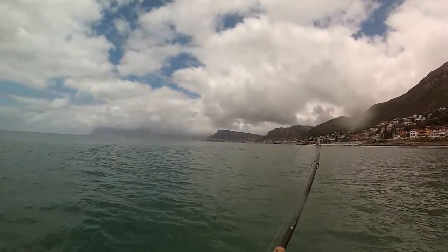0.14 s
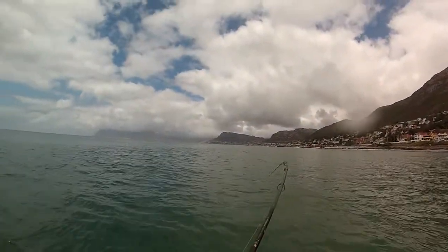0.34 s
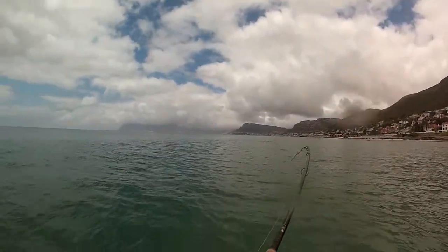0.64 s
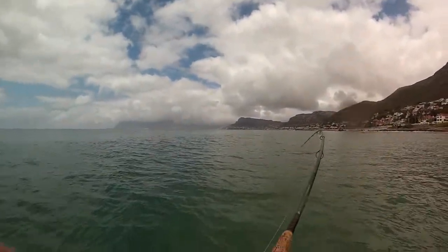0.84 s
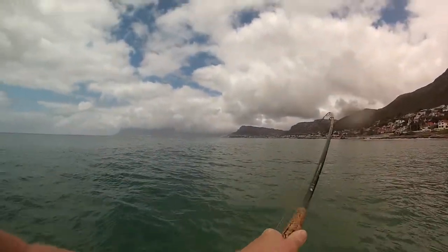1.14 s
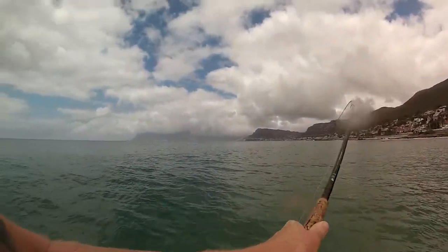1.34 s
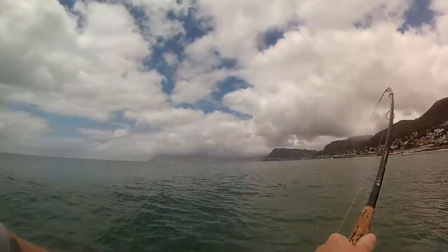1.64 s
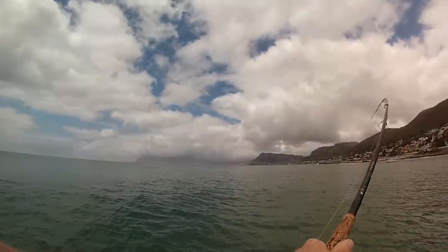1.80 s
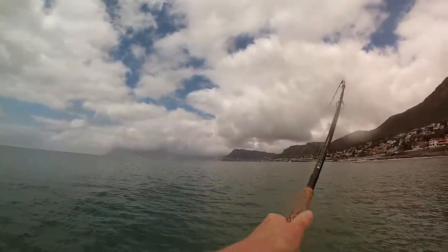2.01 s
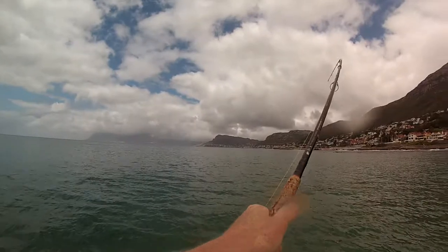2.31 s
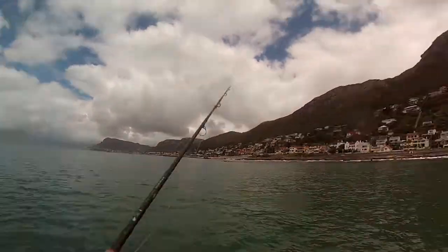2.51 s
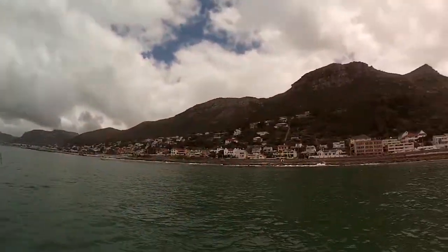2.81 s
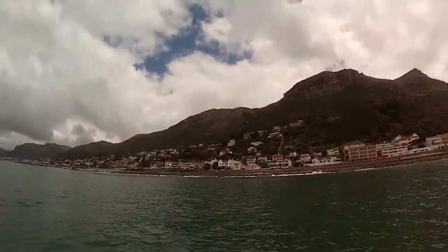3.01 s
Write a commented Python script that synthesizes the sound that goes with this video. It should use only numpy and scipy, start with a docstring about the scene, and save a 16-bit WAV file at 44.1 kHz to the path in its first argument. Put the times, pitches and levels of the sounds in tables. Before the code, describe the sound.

Water lapping on a hollow board, close and boxy: bubbly wash, soft slaps and short splashes early, a quiet lull, then renewed splashes, clicking drops and deep buffeting as the camera turns; faint sea hush throughout.

```python
"""Choppy open water, heard inside a camera's closed waterproof case as small waves lap at a paddleboard.
Slaps are soft pulses with a damped board tone; wash is dense bubble rings over coloured noise.
Splashes are short noise bursts, spray is noise in wavering resonances, plops are damped rising tones.
Drops tick as filtered clicks with tiny rings. Low noise bands buffet the case, strongest in a turn
near the end; a steady sea hush lies behind, with a treble fizz in the turn."""
import sys
import numpy as np
from scipy import signal
from scipy.fft import rfft, irfft, next_fast_len
from scipy.io import wavfile
from scipy.ndimage import uniform_filter1d, map_coordinates

SR = 44100
rng = np.random.default_rng(int(sys.argv[2]) if len(sys.argv) > 2 else 0)


def wav_out(sig):
    """Save sig, one row per channel (or a flat mono array), as 16-bit PCM at SR to the path in sys.argv[1]."""
    wavfile.write(sys.argv[1], SR, np.round(np.clip(np.atleast_2d(sig).T, -1, 1) * 32767).astype(np.int16))


N = 138915


def undb(db):
    """Decibels to amplitude gain."""
    return 10 ** (np.asarray(db) / 20)


def unit(x):
    """Scale to rms 1."""
    return x / np.sqrt(np.mean(x ** 2))


def even(x, seconds):
    """Hold the rms near 1 over stretches of this length."""
    power = uniform_filter1d(x ** 2, size=max(int(seconds * SR), 1))
    return x / np.sqrt(power + 1e-9)


def curve(rows, axis=1):
    """Gain over time, linear in dB between the points of one column."""
    rows = np.array(rows)
    return undb(np.interp(np.arange(N) / SR, rows[:, 0], rows[:, axis]))


def colour(x, points):
    """Minimum-phase filter through (f/Hz, gain/dB) points, by folding the cepstrum."""
    hz, db = np.array(points).T
    size = next_fast_len(2 * N)
    f = np.arange(size // 2 + 1) * SR / size
    gain = undb(np.interp(np.log(f + 1e-9), np.log(hz), db))
    cepstrum = irfft(np.log(gain), size)
    cepstrum[1:size // 2] *= 2
    cepstrum[size // 2 + 1:] = 0
    response = np.exp(rfft(cepstrum))
    return irfft(rfft(x, size) * response, size)[:N]


def noise(points):
    """Coloured noise of rms 1."""
    return unit(colour(rng.standard_normal(N), points))


def walk(steps_per_s):
    """Random steps smoothed twice over one step length, rms 1."""
    k = int(SR / steps_per_s)
    steps = np.repeat(rng.standard_normal(N // k + 1), k)
    smooth = uniform_filter1d(uniform_filter1d(steps, k), k)
    return unit(smooth[:N])


def add(out, start_s, sound):
    """Mix a sound in at its start time."""
    i = max(int(start_s * SR), 0)
    out[i:i + len(sound)] += sound[:max(N - i, 0)]


def bubble(hz, t60_s):
    """Damped ring of a bubble, rising a little in pitch."""
    rise, attack = 0.04, 0.022  # pitch rise per t60 as a share of hz; attack as a share of t60
    t = np.arange(int(t60_s * SR) + 2) / SR
    tone = np.sin(2 * np.pi * hz * t * (1 + rise * t / t60_s / 2))
    decay = np.exp(-np.log(1000) * t / t60_s)
    onset = 1 - np.exp(-t / (attack * t60_s))
    return tone * decay * onset


def slaps():
    """Each wavelet gives a soft push, and the hollow board rings on."""
    # wavelets on the board: centre t/s, push level/dB, push 1/e time/ms, ring re push/dB
    slap_rows = [(0.608, -58.5, 3.8, 6), (0.6751, -52, 0.92, -9.5), (0.772, -55.5, 1.44, -6.5),
                 (0.864, -59, 1.3, -1.5), (1.085, -52.5, 1.24, -5.5), (1.141, -56, 1.64, -8),
                 (1.164, -60.5, 1.16, 4.5), (1.3116, -51.5, 1.32, -4.5), (1.53, -58.5, 3.5, -4),
                 (2.842, -56.5, 0.99, -11)]
    board_hz, board_t60_s = 158.6, 0.07
    out = np.zeros(N)
    for centre_s, db, push_ms, ring_db in slap_rows:
        t = np.arange(N) / SR - centre_s
        u = t / (push_ms / 1000)
        push = (1 - 2 * u ** 2) * np.exp(-u ** 2)
        after = np.maximum(t, 0)
        decay = np.exp(-np.log(1000) * after / board_t60_s)
        ring = np.sin(2 * np.pi * board_hz * after) * decay
        out -= undb(db) * (push + undb(ring_db) * ring)
    return out


def wash():
    """Water runs along the board: dense small bubbles over rushing noise, coloured by the case."""
    # wash along the board: t/s, level before the mix gains/dB
    wash_rows = [(0, -71), (.1, -80), (.18, -72), (.36, -82), (.46, -72.5), (.66, -68.5), (.8, -71),
                 (.88, -66), (.95, -72.5), (1.07, -71.5), (1.13, -66.5), (1.26, -79.5), (1.34, -73),
                 (1.45, -81.5), (1.52, -74.5), (1.66, -78), (1.78, -83), (1.97, -75), (2.1, -79.5),
                 (2.2, -73), (2.37, -81), (2.53, -70), (2.68, -69), (2.78, -72), (2.88, -68.5),
                 (2.97, -75.5), (3.15, -73)]
    # spectrum of wash heard in the case: f/Hz, gain/dB
    wash_colour = [(200, -12.5), (500, -7), (850, -4.5), (1010, 2.5), (1130, -4.5), (1290, 0.5), (1400, 1),
                   (1550, 0), (1820, -8), (2050, 3), (2220, 2), (2340, -0.5), (2470, -0.5), (2650, -8),
                   (3300, -15.5), (3800, -12.5), (4400, -23), (5200, -12.5), (6300, -28.5), (12000, -34.5)]
    grains_per_s, grain_spread_db, grain_t60_cycles = 1300, 2.5, 40
    grain_mix_db, rush_mix_db = -4, -4
    rush = noise(wash_colour)
    grains = np.zeros(N)
    for when, pitch, size in rng.random((int(grains_per_s * N / SR), 3)):
        hz = 450 * 14 ** pitch  # 450 to 6300 Hz
        strength = undb(grain_spread_db * min(-np.log(1 - size), 4))  # few strong, many weak
        add(grains, when * N / SR, strength * hz * bubble(hz, grain_t60_cycles / hz))
    bubbles = unit(colour(grains, wash_colour))
    return curve(wash_rows) * (undb(grain_mix_db) * bubbles + undb(rush_mix_db) * rush)


def splashes():
    """Short gritty noise bursts where a ripple breaks on the edge of the board."""
    # broken ripples: t/s, envelope level/dB, decay time constant/s
    splash_rows = [(0.306, -67.5, 0.0058), (0.585, -65.5, .015), (0.686, -67, .018), (0.778, -66, 0.029),
                   (0.861, -65.5, 0.03), (0.992, -66, 0.0088), (1.122, -68, 0.012), (1.212, -63.5, 0.0092),
                   (1.309, -67, 0.0097), (1.363, -69, 0.011), (1.519, -68.5, 0.01), (1.613, -68, 0.011),
                   (2.51, -69.5, 0.012), (2.598, -69.5, 0.02), (2.645, -66.5, 0.017), (2.693, -72, .012),
                   (2.833, -62.5, 0.011), (2.886, -70, 0.013)]
    # splash spectrum: f/Hz, gain/dB
    splash_colour = [(300, -19), (900, -1.5), (1450, 3.5), (1800, 1.5), (2300, 5.5), (3000, -7),
                     (4400, -14.5), (5500, -13), (7000, -17.5), (12000, -27.5)]
    rise_s = 0.00099
    burst = np.zeros(N)
    for start_s, db, decay_s in splash_rows:
        t = np.maximum(np.arange(N) / SR - start_s, 0)
        burst += undb(db) * (1 - np.exp(-t / rise_s)) * np.exp(-t / decay_s)
    return burst * noise(splash_colour)


def spray():
    """Hiss swells and fades in narrow resonances, each wavering in pitch and strength."""
    # bursts of spray: start t/s, rise/s, hold/s, fall/s, level/dB
    spray_rows = [(0.373, 0.075, 0.36, 0.2, -72), (0.522, 0.049, 0.053, .08, -82),
                  (1.052, 0.041, 0.06, 0.051, -76.5), (3.016, 0.12, 0.044, .05, -81.5)]
    # spray resonances: f/Hz, approximate noise bandwidth/Hz, peak gain/dB
    spray_rings = [(1975, 90, -2), (2200, 150, 0.5), (2490, 82, 1.5), (2830, 153, -1.5), (3240, 150, -7.5),
                   (3765, 99, -8), (5160, 1060, -17.5), (7100, 240, -14), (7960, 200, -17),
                   (9000, 400, -15), (10400, 290, -21.5), (11700, 400, -23)]
    flicker_db, drift = 1.8, 0.008  # rms; drift as a share of the pitch
    t = np.arange(N) / SR
    f = np.arange(N // 2 + 1) * SR / N
    hiss = np.zeros(N)
    for hz, width_hz, db in spray_rings:
        resonance = undb(db) / (1 + ((f - hz) / width_hz * 1.56) ** 2)
        ring = irfft(rfft(rng.standard_normal(N)) * resonance, N)
        place = np.cumsum(1 + drift * walk(14))  # uneven read speed bends the pitch
        wavering = map_coordinates(ring, [place], mode="mirror")
        hiss += wavering * undb(flicker_db * walk(28))
    swell = np.zeros(N)
    for start_s, rise_s, hold_s, fall_s, db in spray_rows:
        corners_s = start_s + np.cumsum([0, rise_s, hold_s, fall_s])
        swell += undb(db) * np.interp(t, corners_s, [0, 1, 1, 0])
    return even(hiss, 0.1) * swell


def plops():
    """Single bubbles ring out from the wash."""
    # bubbles: t/s, starting f/Hz, level before attack and decay/dB, t60/s
    plop_rows = [(0.060, 1590, -63, 0.017), (0.584, 2180, -59, 0.089), (0.6, 3240, -71, .14),
                 (0.648, 2225, -58.5, 0.16), (0.65, 1283, -62.5, 0.18), (0.728, 963, -67, 0.12),
                 (0.736, 2463, -58, 0.078), (0.993, 1390, -58, 0.0095), (1.172, 950, -53, 0.016),
                 (1.3105, 2160, -58.5, 0.017), (1.385, 2223, -56, 0.032), (2.192, 680, -57, 0.032),
                 (2.212, 1360, -58, 0.016), (2.726, 2200, -47, 0.009), (2.8512, 2040, -45.5, 0.007),
                 (2.8515, 1070, -48.5, 0.0072), (2.917, 2400, -61, 0.067)]
    out = np.zeros(N)
    for start_s, hz, db, t60_s in plop_rows:
        add(out, start_s, undb(db) * bubble(hz, t60_s))
    return out


def ticks():
    """Each drop is a sharp click on the case, a trace of spatter and a tiny ring of its own."""
    # drops on the case: t/s, drive level/dB, ring f/Hz, ring re drive/dB
    tick_rows = [(1.619, -64.5, 4460, -1), (2.6472, -50.5, 5670, -20), (2.7268, -65, 2900, -8),
                 (2.7456, -53.5, 6280, -9), (2.8058, -53.5, 5550, -11), (2.8506, -54.5, 5200, -9),
                 (2.8623, -62, 3950, -4), (2.9268, -54.5, 3570, -10)]
    # click spectrum: f/Hz, gain/dB
    tick_colour = [(1000, -24), (3000, 0), (5500, 1.5), (8000, -6), (10500, 2), (12500, -4)]
    spatter_decay_s, spatter_db, ring_t60_s = 0.0014, -11, 0.01
    clicks, rings = np.zeros(N), np.zeros(N)
    t = np.arange(SR // 100) / SR
    for start_s, db, hz, ring_db in tick_rows:
        impulse = 2 * (t == 0)
        spatter = undb(spatter_db) * rng.standard_normal(len(t)) * np.exp(-t / spatter_decay_s)
        add(clicks, start_s, undb(db) * (impulse + spatter))
        add(rings, start_s, undb(db + ring_db) * bubble(hz, ring_t60_s))
    return colour(clicks, tick_colour) + rings


def buffet():
    """Air and movement press on the case: slow swings, a rolling rumble and a low boom."""
    # buffeting: t/s, slow swing level/dB, rumble level/dB, boom level/dB
    buffet_rows = [(0, -36.5, -57, -64), (.06, -47.5, -69, -78), (.25, -44, -61.5, -77),
                   (.39, -49, -61, -77.5), (.46, -46, -68, -75.5), (.55, -39, -59, -72.5),
                   (.67, -40, -58, -68.5), (.75, -41.5, -73, -73.5), (.93, -40, -53, -68),
                   (1.03, -47, -61.5, -76.5), (1.13, -37, -60, -69.5), (1.23, -39.5, -58.5, -76),
                   (1.37, -51, -57.5, -79), (1.44, -58, -66.5, -78), (1.58, -36, -63, -75),
                   (1.72, -58.5, -64.5, -80), (1.95, -46, -61.5, -69.5), (2.15, -49.5, -68, -74),
                   (2.36, -48.5, -59.5, -72), (2.47, -49, -63.5, -71), (2.65, -42.5, -49.5, -67.5),
                   (2.72, -41, -52, -67), (2.79, -36.5, -50.5, -62.5), (2.89, -31.5, -52.5, -59),
                   (3.0, -50.5, -61.5, -70), (3.06, -45, -51, -67), (3.15, -44.5, -63, -72)]
    # slow swing spectrum: f/Hz, gain/dB
    swing_colour = [(3, -29), (10, 0.5), (17, -4), (24, -19), (40, -35.5), (120, -84.5)]
    # rumble spectrum: f/Hz, gain/dB
    rumble_colour = [(15, -12), (26, 3), (38, -0.5), (52, -12), (70, -18.5), (120, -33.5), (400, -72)]
    # boom spectrum: f/Hz, gain/dB
    boom_colour = [(30, -5), (70, 0.5), (100, -1.5), (125, -1.5), (165, 2.5), (205, -9), (300, -16),
                   (500, -24.5), (1200, -46.5), (5000, -82)]
    swing = even(noise(swing_colour), 0.23) * curve(buffet_rows, axis=1)
    rumble = even(noise(rumble_colour), 0.08) * curve(buffet_rows, axis=2)
    boom = even(noise(boom_colour), 0.08) * curve(buffet_rows, axis=3)
    return swing + rumble + boom


def sea():
    """Open water as a steady, slightly flickering noise hush, with a fine treble fizz in the turn."""
    # hush spectrum: f/Hz, gain/dB
    sea_colour = [(100, 6), (300, 3), (700, -0.5), (1400, -6.5), (1800, -7), (2300, -15.5), (3000, -12.5),
                  (4300, -14), (5200, -15.5), (6500, -15), (12500, -18.5)]
    # treble fizz in the turn: t/s, level/dB
    fizz_rows = [(2.35, -100), (2.55, -95), (2.7, -84), (2.78, -93), (2.88, -80), (2.96, -96), (3.04, -84),
                 (3.13, -80.5)]
    # fizz spectrum: f/Hz, gain/dB
    fizz_colour = [(2000, -15.5), (2600, -2.5), (3000, 5.5), (3500, 4), (3950, 15), (4500, -2.5),
                   (5300, 7.5), (6300, -7.5), (8200, -7), (9100, -4), (10000, -23), (12500, -33)]
    level_db, flicker_db = -75, -0.6  # flicker sign only flips the random walk
    hush = noise(sea_colour) * undb(level_db + flicker_db * walk(4.4))
    fizz = noise(fizz_colour) * curve(fizz_rows)
    return hush + fizz


def scene():
    """All sources summed at one microphone."""
    water = slaps() + wash() + splashes() + spray() + plops() + ticks()
    return (water + buffet() + sea())[None]


def record(dry):
    """The camera cuts the top with a steep elliptic low-pass."""
    top_hz, ripple_db, stop_db = 12750, 0.2, 60
    sos = signal.ellip(10, ripple_db, stop_db, top_hz, fs=SR, output="sos")
    return signal.sosfilt(sos, dry)


dry = scene()
out = record(dry)
wav_out(out)
```